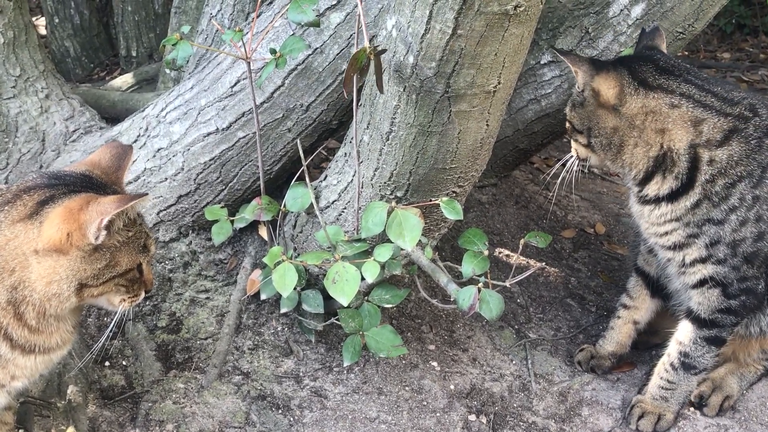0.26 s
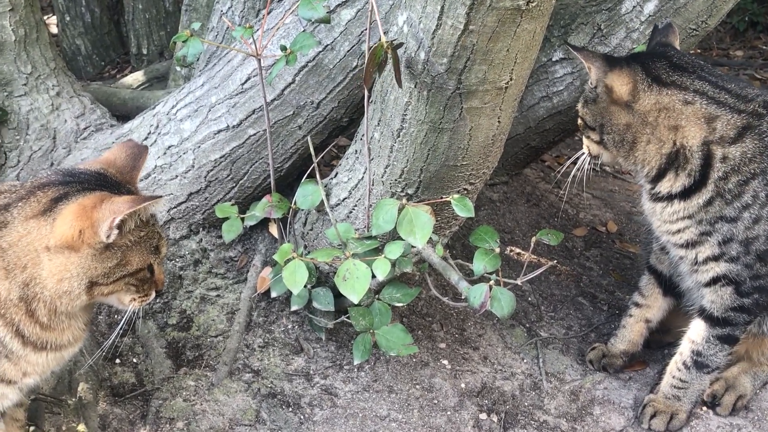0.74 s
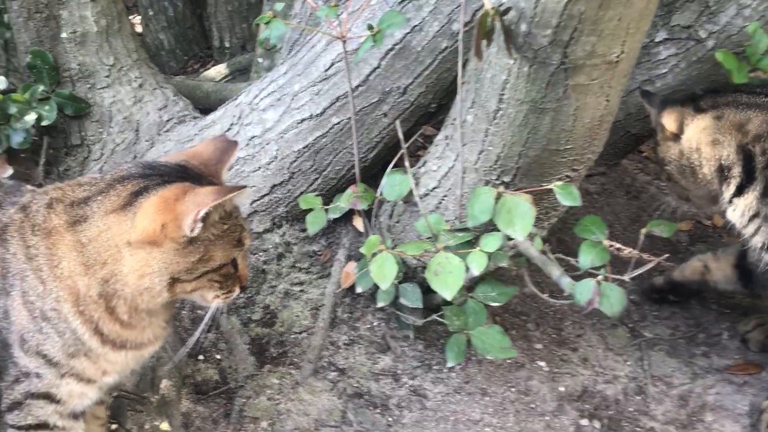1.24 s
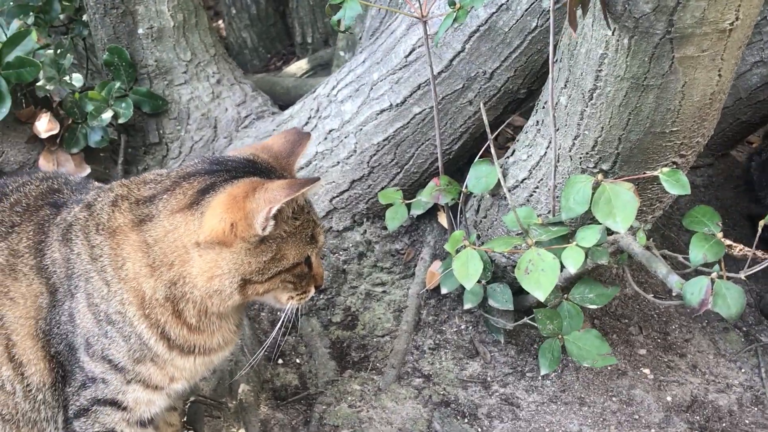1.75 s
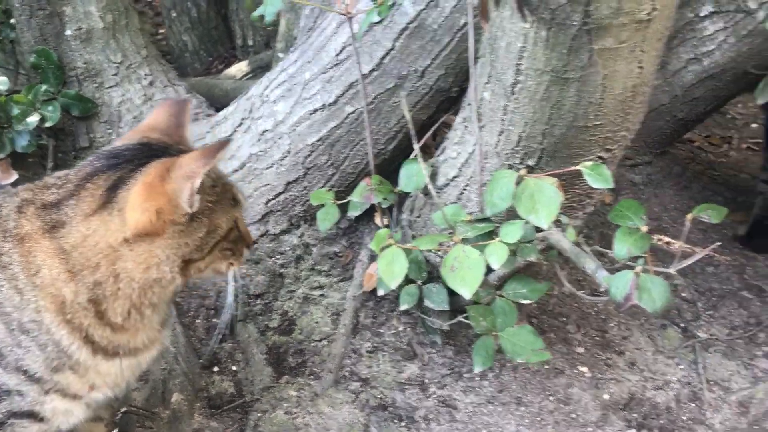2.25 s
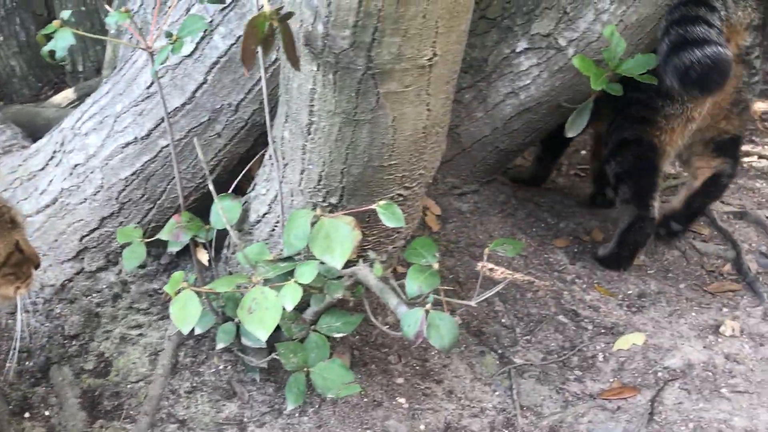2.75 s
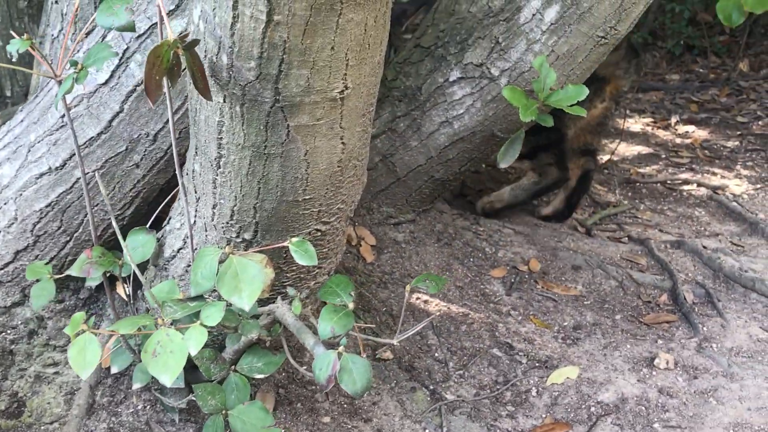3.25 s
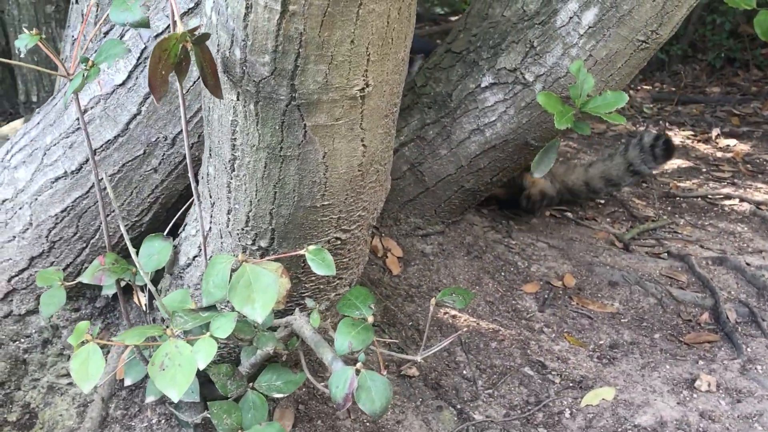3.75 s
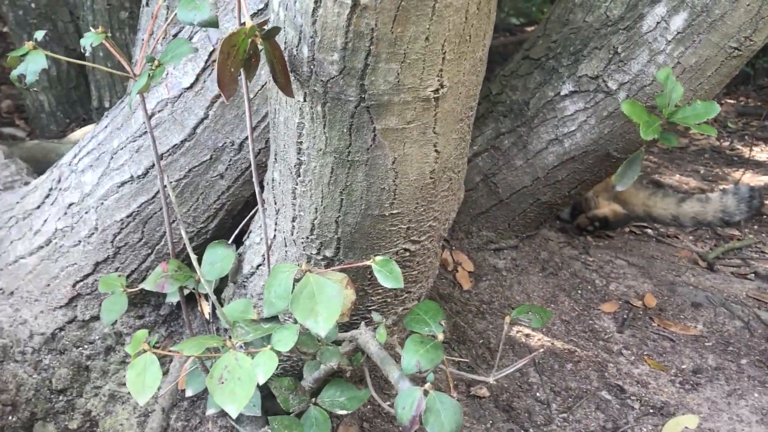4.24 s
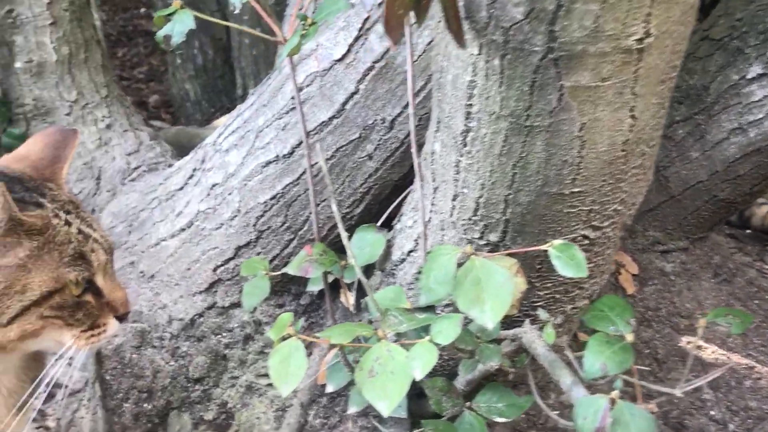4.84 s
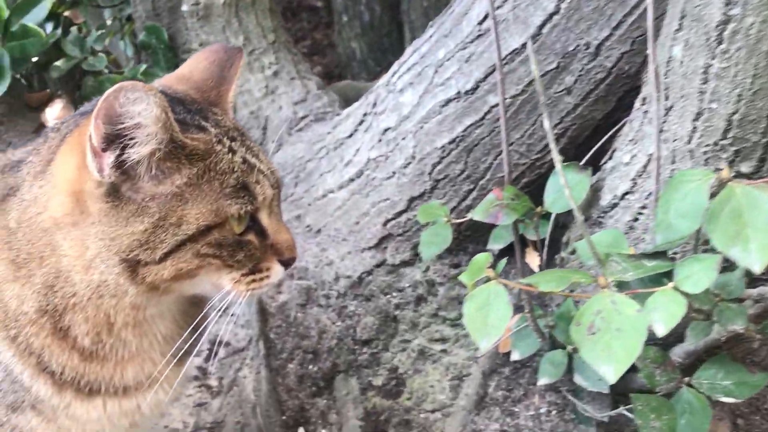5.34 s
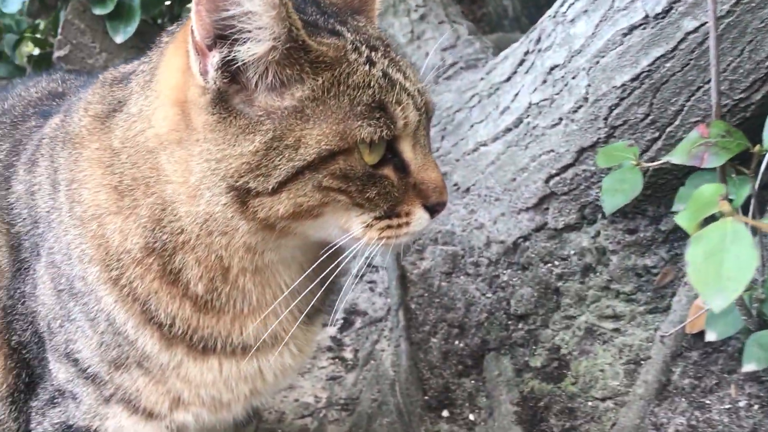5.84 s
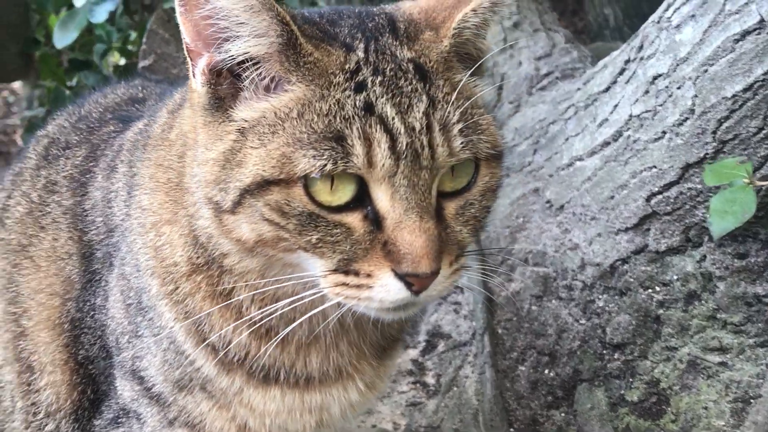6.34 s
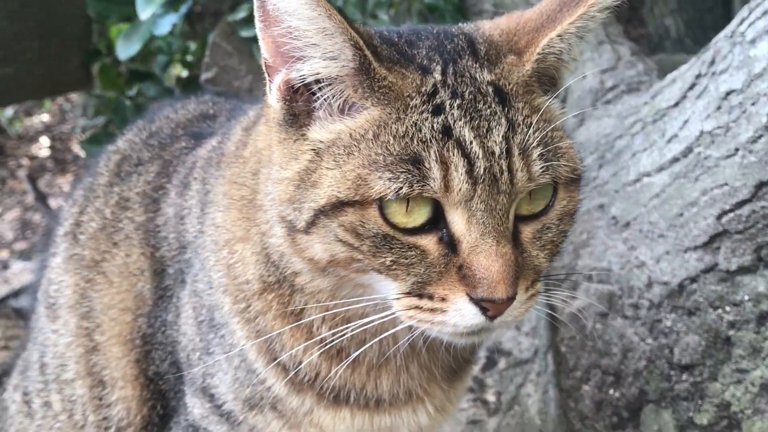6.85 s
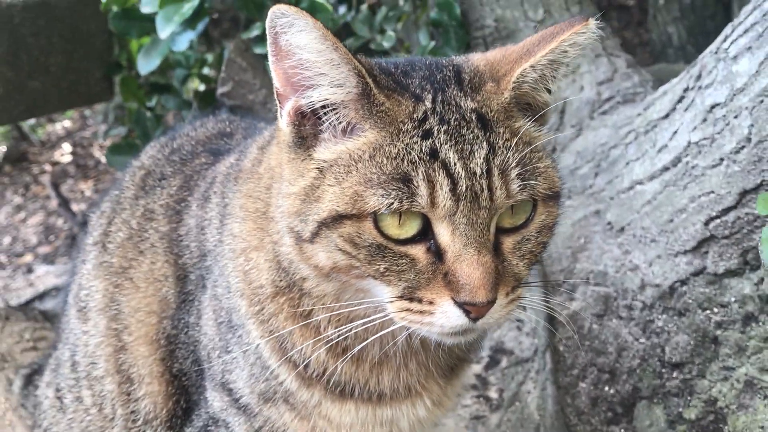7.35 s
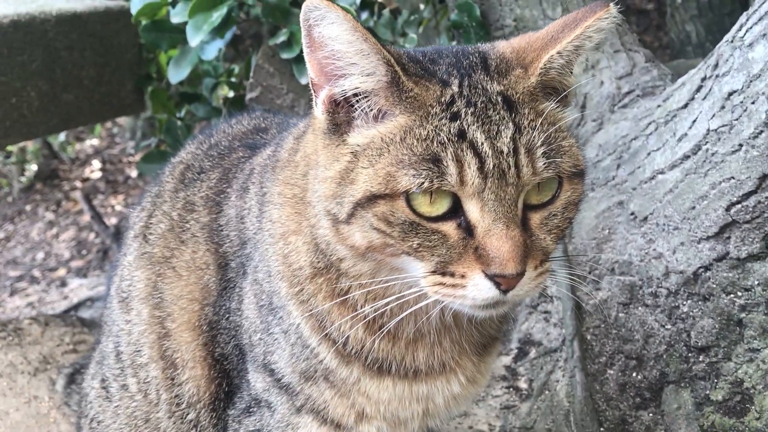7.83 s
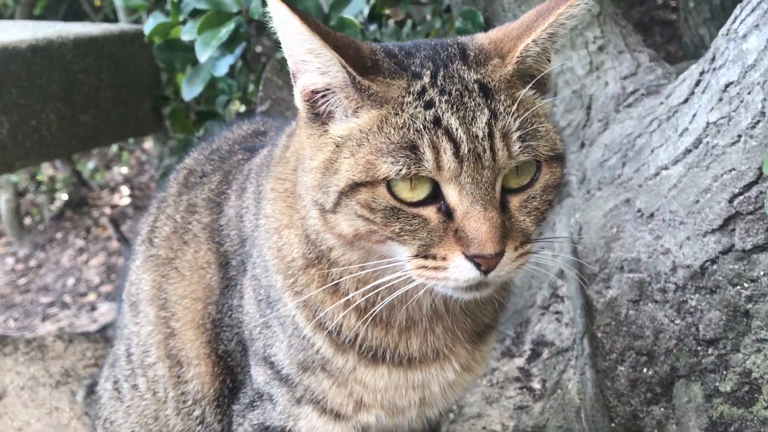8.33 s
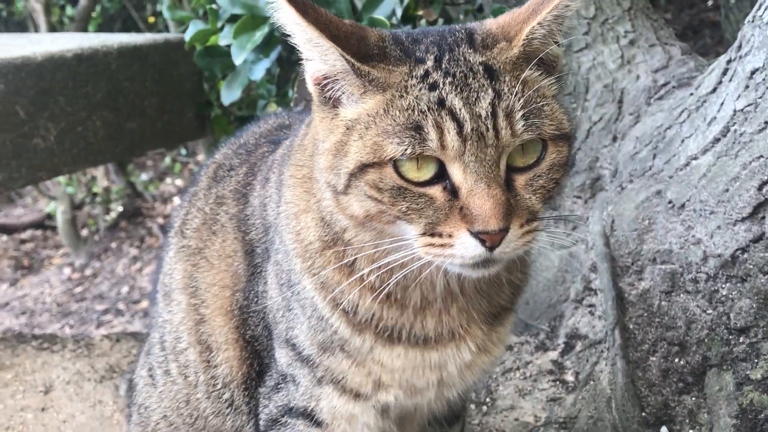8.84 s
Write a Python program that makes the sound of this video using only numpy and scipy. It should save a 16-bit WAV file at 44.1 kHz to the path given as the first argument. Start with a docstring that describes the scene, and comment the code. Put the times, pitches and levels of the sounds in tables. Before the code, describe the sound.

Throughout, two cicadas buzz nearly together in very high, dry, grainy bursts, about five and a half per second, each under a tenth of a second, blurred by echoes off trunks and leaves. A nearer cricket finishes a trill at 0.1 s, then trills at 0.4-1.0 and 1.2-1.8 s, at about 5 kHz with rapid strokes. Farther crickets give tiny falling chirps, higher pitched, some clearer around 5.5-6.3 s. Low wind flutters and thumps on the microphone from about 1 s, notably at 2.2, 4.2-5 and strongest near 5.5 s, then calmer. A faint distant roar and leaf rustle lie beneath. Dry leaves tick sparsely at 1.4, 2.2, 3.5, 3.8, 4.0, 4.5 and 6.8 s. From 8.85 s a hand slides roughly over the microphone, abruptly muffling the insects; woody, boxy knocks peak loudly at 9.0-9.03 s.

```python
"""Among trees, two cicadas buzz in step: trains of drum clicks, scattered by trunks and leaves.
A cricket trills in sliding tones, the first trill just ending; others chirp farther off, short and falling.
A breeze buffets the microphone with lumpy low noise and eddies, over a roar and rustle of coloured noise;
dry leaves tick as brief damped tones. At the end a hand slides over the microphone in grainy noise,
muffling the wood, and its knocks ring the modes of the case."""
import sys
import numpy as np
from scipy import signal
from scipy.fft import rfft, irfft, next_fast_len
from scipy.io import wavfile

SR = 44100
rng = np.random.default_rng(int(sys.argv[2]) if len(sys.argv) > 2 else 0)


def output_pcm(signal):
    """Save a mono or channel-first signal as 16-bit PCM at the path in sys.argv[1].

    Samples are clipped to [-1, 1] before scaling.
    """
    pcm = np.clip(np.atleast_2d(signal).T, -1, 1) * 32767
    wavfile.write(sys.argv[1], SR, np.round(pcm).astype(np.int16))


def volts(x):
    """Linear amplitude factor 10**(x/20) for a level x in dB, scalar or array-like."""
    e = np.asarray(x, float) / 20
    return 10 ** e


N = 400849
HAND_S = 8.853  # when the hand covers the microphone


def evened(x):
    """Scales to rms 1."""
    return x / np.sqrt(np.mean(x ** 2) + 1e-20)


def curve(rows):
    """Draws every column of a table, after its times, as a line through all samples."""
    s, *columns = np.transpose(rows)
    return [np.interp(np.arange(N) / SR, s, c) for c in columns]


def add(mix, s, sound):
    """Mixes a sound in at time s, dropping what falls outside."""
    at = round(s * SR)
    sound = sound[max(-at, 0):]
    part = mix[max(at, 0):][:len(sound)]
    part += sound[:len(part)]


def coloured(x, points):
    """Filters by a spectrum of (Hz, dB) points, joined on a log frequency scale."""
    size = next_fast_len(len(x))
    f, db = np.transpose(points)
    hz = np.fft.rfftfreq(size, 1 / SR)
    gain = volts(np.interp(np.log(hz + 1), np.log(f + 1), db))
    return irfft(rfft(x, size) * gain, size)[:len(x)]


def noise(points, lumps_db=0., lump_s=.03):
    """Coloured noise of rms 1 whose level wanders in lumps."""
    lumps = evened(signal.oaconvolve(rng.standard_normal(N), np.hanning(round(lump_s * SR)), "same"))
    steady = evened(coloured(rng.standard_normal(N), points))
    return evened(steady * volts(lumps_db * lumps))


def trees(x, t60, drift_hz):
    """Scatter off trunks and leaves: three random tails that take turns as the foliage moves."""
    t = np.arange(SR // 2) / SR
    out = np.zeros(len(x))
    for k in range(3):
        tail = rng.standard_normal(len(t)) * volts(-60 * t / t60) * (1 - np.exp(-t / 0.00088))
        share = np.cos(np.pi * (drift_hz * np.arange(len(x)) / SR + k / 3))
        out += signal.oaconvolve(x * share, tail / np.linalg.norm(tail))[:len(x)]
    return out


def cicada():
    """Each drum clicks regularly through each burst; echoes fill the gaps and trail after."""
    # cicada bursts, the first already dying away at the start: start_s
    burst_starts = [-.084, .1003, .2835, .4707, .6586, .8421, 1.0298, 1.2137, 1.4022, 1.5846, 1.77, 1.9483,
                    2.1321, 2.3115, 2.4932, 2.6773, 2.8582, 3.041, 3.2289, 3.4079, 3.5901, 3.7757, 3.9587,
                    4.1465, 4.3302, 4.4975, 4.6751, 4.8581, 5.0363, 5.2149, 5.3954, 5.584, 5.7666, 5.9521,
                    6.1364, 6.3167, 6.4991, 6.6841, 6.8679, 7.0474, 7.2318, 7.4168, 7.5992, 7.779, 7.9624,
                    8.1466, 8.3304, 8.5124, 8.6959]
    # spectrum of the scattered clicks and of the far cicadas: pitch_hz, level_db
    buzz_spectrum = [(4470, -42), (7600, -30.5), (8730, -15), (9420, -4.5), (9910, 0), (10200, -5),
                     (10900, 0), (12200, 1), (13100, 1), (15600, -22)]
    # which drummer the turning microphone favours: time_s, quicker_over_slower_db
    favour = [(0, -12), (2.2, 16), (2.7, -7), (4.6, 0), (4.9, 10), (9, 10.5)]
    clicks_per_s = (302, 335)  # the slower and the quicker drummer
    burst_db, burst_spread_db = -57.5, .5  # before the straight and scattered paths
    burst_s, burst_spread_s = 0.086, 0.0027
    answer_s = .008  # the fainter drummer joins up to this late
    ring_hz, ring_half_s = 11600, .0002  # the straight click

    lead = SR // 2  # room for what sounded before the start
    clicks = np.zeros(N + lead)
    chance = rng.standard_normal((len(burst_starts), 2, 3, 40))
    for s, drums in zip(burst_starts, chance):
        quick = 1 / (1 + volts(-2 * np.interp(s, *np.transpose(favour))))  # share of the power
        for rate, share, (late, size, mood) in zip(clicks_per_s, (1 - quick, quick), drums):
            t = np.arange(40) / rate + .0003 + abs(.00007 * late)
            length = burst_s + burst_spread_s * mood[0]
            swelling = 1 - 0.2 * np.exp(-t / 0.03)
            tiring = np.clip((length - t) / 0.028, 0, 1)
            click_db = burst_db + burst_spread_db * mood[1] + 1.3 * size
            train = np.zeros(round(.15 * SR))
            train[(t * SR).astype(int)] = volts(click_db) * tiring * swelling
            wait = (share < .5) * answer_s * min(abs(mood[2]), 1)
            add(clicks, s + lead / SR + wait, train * np.sqrt(share * SR / rate))

    u = np.arange(-30, 31) / SR
    ring = np.exp(-(u / ring_half_s) ** 2) * np.cos(2 * np.pi * ring_hz * u)
    straight = volts(-6) * signal.oaconvolve(clicks, ring / np.linalg.norm(ring), "same")
    tails = volts(5) * trees(clicks, 0.18, 18.0) + volts(-6) * trees(clicks, 0.55, 3.4)
    scattered = coloured(tails, buzz_spectrum)
    far_away = volts(-78.5) * noise(buzz_spectrum, 1.3, 0.0044)
    return (straight + scattered)[lead:] + far_away


def trilling_cricket():
    """Each wing stroke slides down; a trill climbs, quickens, swells and fades; echoes join strokes."""
    # trills, levels before swell and stroke changes, echo off a trunk before its build-up,
    # slide before slide_share: start_s, length_s, top_db, echo_db, slide_hz
    trills = [(-.48, 0.568, -54, -16, 432), (0.434, 0.58, -56.5, -25, 430), (1.187, 0.606, -56.5, -8, 261)]
    # at the start and the end of a trill
    trill_hz, strokes_per_s, slide_share = (5060, 5220), (47.6, 50), (.75, 0.81)
    warm_up_db, warm_up_s, swell_db = -9, 0.04, -4.5
    tire_db, tire_s = -5, .025
    echo_late_db, echo_late_s = -8, 0.091  # the echo builds after the first strokes

    out, echo = np.zeros((2, N))
    for s, length, top_db, echo_db, slide_hz in trills:
        t = np.arange(0, length, 1 / SR)
        course = (t / length) ** .4
        hz, rate, share = (a + (b - a) * course for a, b in (trill_hz, strokes_per_s, slide_share))
        db = top_db + warm_up_db * np.exp(-t / warm_up_s)
        db += swell_db * (1 - t / length) + tire_db * np.exp((t - length) / tire_s)
        strokes = np.cumsum(rate) / SR
        db += 1.1 * rng.standard_normal(40)[strokes.astype(int)]  # strokes differ
        rub = np.minimum(strokes % 1 / 0.58, 1)  # 0-1 while the wings rub, then 1
        pitch = hz + slide_hz * share * ((1 - rub) ** 1.9 - .35)
        tone = np.sin(2 * np.pi * np.cumsum(pitch) / SR)
        song = volts(db) * np.sin(np.pi * rub) ** 0.51 * tone
        song *= np.minimum((length - t) * 200, 1)  # no abrupt end
        add(out, s, song)
        add(echo, s + 0.0095, volts(echo_db + echo_late_db * np.exp(-t / echo_late_s)) * song)
    return out + echo + volts(-7.5) * trees(out + echo, 0.24, 1.5)


def far_crickets():
    """Short falling chirps with their echoes; louder ones fall further, fainter ones come at random."""
    # chirps, high singers then low, levels before distance: time_s, peak_db, middle_hz
    # (the row at 3.7733 s is no cricket: it adds a soft tone to a dry leaf tick)
    chirps = [(0.0323, -64, 7030), (0.3506, -64, 7050), (0.6669, -66, 7060), (1.0076, -67, 7070),
              (1.2301, -69, 6960), (1.3319, -63.5, 7070), (1.7105, -66, 7070), (2.0637, -67, 7050),
              (2.3136, -75, 6960), (2.9796, -81, 6960), (3.1682, -70, 7030), (3.4476, -65, 6940),
              (3.7244, -65, 7030), (3.7733, -77, 6850), (4.0262, -65, 7040), (4.3136, -66, 7010),
              (4.4702, -73, 6890), (4.591, -66, 6970), (4.7531, -73, 6940), (4.8923, -66, 7040),
              (5.1801, -66, 7050), (5.3313, -79, 7040), (5.4939, -66, 6850), (5.8576, -67, 6800),
              (5.9424, -71, 7020), (6.0422, -75, 7060), (6.1629, -74, 7010), (6.2392, -72, 7100),
              (6.5106, -67, 6900), (6.7311, -70, 6860), (6.8728, -66, 7030), (7.1876, -68, 6990),
              (7.5123, -67, 7040), (7.8356, -68, 7040), (8.1738, -68, 7000), (8.5031, -70, 7040),
              (0.0757, -68, 6480), (0.3316, -68, 6400), (0.4389, -69, 6470), (0.6734, -67, 6360),
              (0.8051, -74, 6470), (1.0106, -69, 6370), (1.1732, -70, 6760), (1.3623, -65, 6350),
              (1.4805, -68, 6730), (1.71, -68, 6370), (1.9664, -71, 6460), (2.0592, -65, 6360),
              (2.2538, -67, 6560), (2.4494, -73, 6720), (2.6065, -68.5, 6660), (2.7766, -73, 6840),
              (2.9821, -64.5, 6650), (3.1263, -71, 6690), (3.3393, -66, 6680), (3.4511, -66, 6680),
              (3.7244, -68, 6650), (3.7894, -68, 6800), (4.0557, -66, 6600), (4.14, -74, 6690),
              (4.4009, -63, 6540), (4.4702, -73, 6700), (4.6982, -74, 6500), (4.7541, -66, 6630),
              (4.9501, -72, 6800), (5.0285, -76, 6550), (5.1218, -64, 6750), (5.4944, -57, 6580),
              (5.7349, -73, 6560), (5.8701, -58.5, 6640), (6.0896, -73, 6550), (6.1629, -73, 6760),
              (6.2407, -59.5, 6710), (6.5121, -72, 6660), (6.8673, -68, 6700), (7.8466, -73, 6900),
              (7.9658, -69, 6750), (8.113, -71, 6320), (8.1743, -71, 6700), (8.5001, -72, 6450)]
    singers_hz, faint_db = (6650, 6680, 6790, 7050), -77  # random chirps: pitches and lowest level
    when, who, size = rng.random((110, 3)).T
    singer = np.take(singers_hz, (4 * who).astype(int))
    faint = np.transpose([when * N / SR, faint_db + 4.9 * size ** 2, singer])
    out = np.zeros(N)
    for s, db, hz in [*chirps, *faint]:
        u = np.linspace(0, 1, round(0.025 * SR))
        pitch = hz + 14 * max(db + 79, 0) * (.5 - u)
        tone = np.sin(2 * np.pi * np.cumsum(pitch) / SR)
        add(out, s - .002, volts(db) * np.sin(np.pi * u ** 0.33) * tone)
    # the farthest run together
    blur = noise([(6000, -42), (6350, 0.5), (6700, -2.5), (7100, 1.0), (7450, -52)], 2.3, 0.076)
    return volts(-2.0) * out + volts(-5.0) * trees(out, 0.18, 1.67) + volts(-86.5) * blur


def wind():
    """Rumble and flutter follow the breeze; a buffet heaves one, shakes the other and sheds an eddy."""
    # spectrum of the deep rumble: pitch_hz, level_db
    rumble_spectrum = [(15, -30.5), (30, -11), (55, 2), (85, -4), (130, -20), (300, -71)]
    # spectrum of the flutter: pitch_hz, level_db
    flutter_spectrum = [(50, -41), (110, 2), (150, -0.5), (250, -11), (400, -26), (800, -73)]
    # strength of the breeze: time_s, rumble_db
    breeze = [(0.0, -59), (0.93, -61), (1.16, -54.5), (1.45, -51.5), (1.9, -62.5), (2.27, -48),
              (2.46, -60.5), (4.19, -62), (4.58, -52.5), (5.0, -62.5), (5.54, -50), (5.74, -59),
              (6.16, -50.5), (6.53, -65), (7.49, -55), (8.45, -57.5), (8.65, -64), (8.85, -59)]
    # buffets on the microphone, eddy pitch approximate: start_s, eddy_peak_db, eddy_hz, rumble_db
    buffets = [(0.106, -70, 132, -53), (0.469, -68, 178, -51), (0.59, -63, 129, -52),
               (0.969, -37.5, 123, -62), (1.188, -40, 148, -41), (1.264, -41.5, 122, -50),
               (1.388, -40, 182, -63), (1.505, -46.5, 213, -62), (1.595, -37.5, 121, -45),
               (1.88, -60, 153, -55), (2.175, -34, 134, -42.5), (2.335, -50.5, 234, -49),
               (2.69, -47, 128, -47.5), (2.805, -50, 145, -50), (2.958, -50.5, 151, -72),
               (3.159, -39, 123, -49.5), (3.198, -47.5, 217, -53), (3.42, -63, 120, -54),
               (3.815, -41.5, 150, -50.5), (3.977, -52, 120, -51), (4.214, -46, 119, -40.5),
               (4.328, -38.5, 148, -47.5), (4.401, -46, 121, -45), (4.546, -39, 146, -54),
               (4.634, -47, 121, -47), (4.681, -41.5, 167, -52), (4.845, -42, 132, -48),
               (4.979, -53, 120, -53.5), (5.1, -47.5, 147, -48.5), (5.151, -46, 134, -52),
               (5.225, -47, 175, -53), (5.269, -39, 123, -59), (5.358, -41.5, 126, -44.5),
               (5.448, -32, 204, -43), (5.466, -30, 235, -62), (5.513, -45, 186, -55),
               (5.536, -26.5, 120, -43), (5.629, -40, 200, -41), (5.668, -35.5, 121, -48),
               (5.872, -41, 212, -42), (5.921, -42.5, 151, -50), (5.976, -43, 167, -44.5),
               (6.009, -54, 121, -54), (6.051, -49, 143, -53), (6.159, -41.5, 189, -48),
               (6.239, -43, 234, -43.5), (6.364, -46.5, 122, -45), (6.608, -41.5, 122, -50),
               (6.705, -48, 135, -56), (7.238, -54, 145, -53), (7.599, -38, 148, -45),
               (7.857, -55, 129, -46), (7.962, -50, 144, -65), (8.156, -56, 140, -64),
               (8.404, -47.5, 136, -52), (8.47, -41.5, 202, -58), (8.599, -55, 124, -55)]
    flutter_db, flutter_slope = -65.5, 0.8  # at a breeze of -61.5 dB; dB gained per dB of breeze
    shake_db, shake_s = -6, 0.026  # flutter relative to the eddy's peak; it is strongest at a quarter
    heave_s, heave_early_s = 0.062, 0.013  # the rumble's swell

    breeze_db = curve(breeze)[0]
    rumble_power = volts(2 * breeze_db)
    flutter_power = volts(2 * (flutter_db + flutter_slope * (breeze_db + 61.5)))
    eddies = np.zeros(N)
    shake_time = np.arange(SR // 4) / SR / shake_s * 4
    for (s, db, hz, rumble_db), turn in zip(buffets, rng.random((len(buffets), 1))):
        add(rumble_power, s - heave_early_s, volts(2 * rumble_db) * np.hanning(round(heave_s * SR)))
        add(flutter_power, s, volts(2 * (db + shake_db)) * shake_time * np.exp(1 - shake_time))
        u = np.linspace(0, 1, round(1.6 * SR / hz))
        swirl = np.sin(2 * np.pi * (1.64 * u ** 0.73 + turn))
        add(eddies, s, volts(db) * np.sin(np.pi * u ** 0.69) ** 2 * swirl)
    rumble = np.sqrt(rumble_power) * noise(rumble_spectrum, 1.0, 0.018)
    flutter = np.sqrt(flutter_power) * noise(flutter_spectrum, 3.5, 0.014)
    return eddies + rumble + flutter


def roar():
    """A distant roar: low noise that slowly swells and sinks."""
    # spectrum of the roar: pitch_hz, level_db
    roar_spectrum = [(100, -1), (200, -3.5), (430, -1.5), (800, -7.5), (1300, -14.5), (2500, -25.5)]
    # level of the roar: time_s, level_db
    passing = [(0, -72), (.9, -73), (1.1, -69), (1.5, -72), (2.2, -69.5), (3.6, -68.5), (4.15, -69),
               (5.6, -70), (6.6, -72.5), (8.3, -70.5), (9.1, -73)]
    return volts(curve(passing)[0]) * noise(roar_spectrum, 1.2, 0.04)


def rustle():
    """Leaves brush together as steady grainy noise, with swells of noise in bands of their own."""
    # spectrum of the leaves: pitch_hz, level_db
    leaf_spectrum = [(600, -9), (1200, -2), (2300, -0.5), (2850, -4), (4000, -3.5), (5700, -6), (7600, -8),
                     (12000, -6), (16000, -10)]
    # swells of rustle, some brief, some a second long: start_s, length_s, level_db, pitch_hz, width_hz
    swells = [(1.3, 0.47, -84, 2300, 2500), (2.2, .09, -75, 2500, 3000), (3.15, 1, -69, 630, 500),
              (3.47, .07, -75, 3500, 3500), (3.78, 0.22, -75, 4240, 1500), (6.76, 0.092, -74, 900, 500),
              (6.82, 0.11, -73, 2470, 3600), (8.201, 1, -74, 1190, 500)]
    out = volts(-74.5) * noise(leaf_spectrum, 1.3, 0.0064)
    for s, length, db, hz, width in swells:
        edges = [(hz / 4, -40), (hz - width / 2, 0), (hz + width / 2, 0), (hz * 3, -40)]
        count = round(length * SR)
        add(out, s, volts(db) * noise(edges, 2.0, 0.0106)[:count] * np.hanning(count))
    return out


def leaf_ticks():
    """Dry leaves tick: damped tones, shorter where wider in pitch, with a little scatter."""
    # ticks of dry leaves: start_s, peak_db, pitch_hz, width_hz
    tick_list = [(1.406, -53.5, 2450, 2500), (2.239, -52.5, 3000, 2500), (2.243, -56, 2000, 1500),
                 (2.9514, -61, 2200, 1200), (3.4984, -49.5, 4530, 4000), (3.507, -65, 4000, 2500),
                 (3.776, -48, 5060, 3500), (3.9644, -58, 3800, 2000), (3.9832, -55, 1240, 600),
                 (4.505, -58.5, 2610, 450), (4.642, -64, 5700, 400), (4.6555, -68, 5600, 400),
                 (4.782, -59.5, 1200, 500), (6.785, -57, 800, 350), (6.868, -56, 870, 500),
                 (8.2404, -68, 2260, 1000)]
    ticks = np.zeros(N)
    u = np.arange(600) / SR
    for s, db, hz, width in tick_list:
        decay = np.pi * width * u
        add(ticks, s, volts(db) * decay * np.exp(1 - decay) * np.sin(2 * np.pi * hz * u))
    return ticks + volts(-3.5) * trees(ticks, 0.058, 0.99)


def hand():
    """Skin drags in grains; each knock rings the case, high modes first, harder knocks brighter."""
    # skin sliding on the case: time_s, level_db
    slide = [(8.85, -53), (8.875, -51.5), (8.905, -44), (8.925, -44.5), (8.95, -45), (8.975, -39),
             (8.99, -40.5), (9.02, -54), (9.05, -45), (9.07, -65), (9.09, -57)]
    # spectrum of the dragging skin: pitch_hz, level_db
    skin_spectrum = [(30, -17), (70, 5.5), (200, -18), (650, -7), (1500, -22.5), (2400, -16.5), (3300, -37),
                     (4500, -40), (8000, -54.5)]
    # knocks on the case: start_s, peak_db, hardness_db_per_octave, low_mode_weight_db
    knocks = [(8.8621, -28.5, 6.5, 12), (8.9105, -48, 10, -3), (8.9165, -41, 7, 14), (8.9359, -42, 8, 4),
              (8.9576, -32.5, -1, -1), (8.9713, -43, -6, 7), (8.982, -26, 6.5, 6), (8.9961, -16, 1, 10.5),
              (9.0037, -21.5, 7, 28.5), (9.0294, -11.5, 1.5, 5), (9.0501, -42, 1, -14),
              (9.0597, -36.5, -3, -1)]
    # modes of the case, before hardness and weight: pitch_hz, level_db, t60_s
    case_modes = [(72, 10, 0.03), (167, -5, 0.042), (316, 5.5, 0.031), (476.5, 0.5, 0.05),
                  (703, 5.5, 0.022), (800, 9.5, 0.019), (933, -22.5, 0.17), (1200, 7.5, 0.015),
                  (1466, 0.5, 0.017), (2200, -1.5, 0.0091), (2900, -13.5, 0.015), (3500, -10, 0.0045),
                  (4920, -28.5, 0.0039), (6800, -40, 0.0039)]
    touching = np.clip((np.arange(N) / SR - HAND_S) / .004 + 1, 0, 1)
    out = noise(skin_spectrum, 4.2, .003) * touching * volts(curve(slide)[0])
    hz, mode_db, t60 = np.transpose(case_modes)[:, :, None]
    u = np.arange(4000) / SR
    for s, db, hard, weight_db in knocks:
        late = np.maximum(u - 0.54 / hz, 0)  # low bending waves travel slower
        ring_db = mode_db + hard * np.log2(hz / 800) + weight_db * (hz < 600) - 60 * late / t60
        rings = volts(ring_db) * (1 - np.exp(-late * hz))
        knock = (rings * np.sin(2 * np.pi * hz * late)).sum(0)
        add(out, s, volts(db) * knock / abs(knock).max())
    return out


def scene():
    """The wood, muffled once the hand covers the microphone: insects by 24 dB, roar and leaves by 3."""
    covered = np.clip((np.arange(N) / SR - HAND_S) / .003, 0, 1)
    insects = (cicada() + trilling_cricket() + far_crickets()) * volts(-24 * covered)
    breeze = wind()
    background = (roar() + rustle() + leaf_ticks()) * volts(-3 * covered)
    return (insects + background + breeze + hand())[None]


def roll_off(x):
    """The treble ends steeply here."""
    return signal.sosfilt(signal.butter(12, 15780, fs=SR, output="sos"), x)


def record(dry):
    """The microphone loses the deepest bass, below 33.6 Hz."""
    bass_cut = signal.butter(2, 33.6, "high", fs=SR, output="sos")
    mix = signal.sosfilt(bass_cut, dry)
    return roll_off(mix)


dry = scene()
out = record(dry)
output_pcm(out)
```